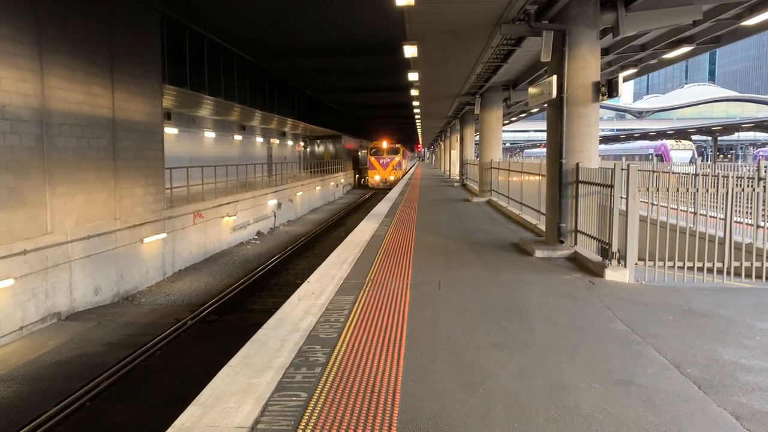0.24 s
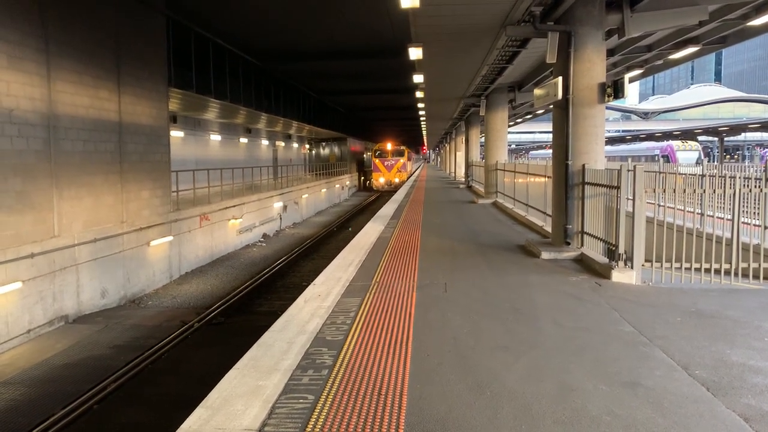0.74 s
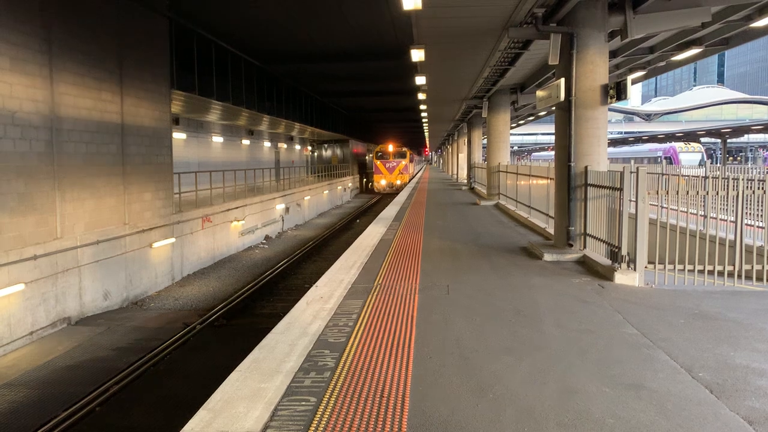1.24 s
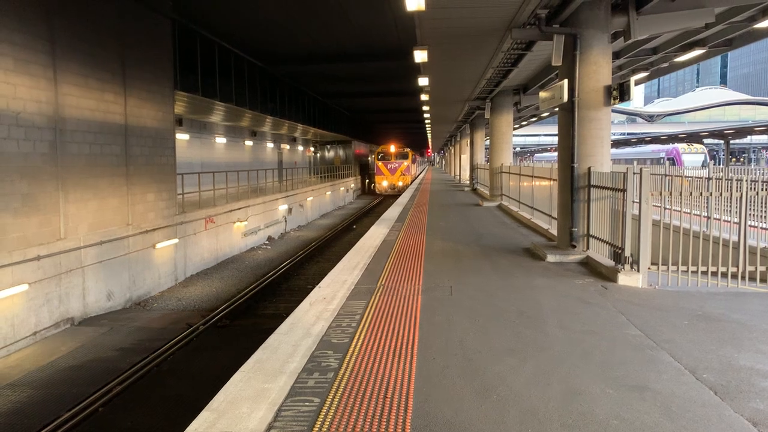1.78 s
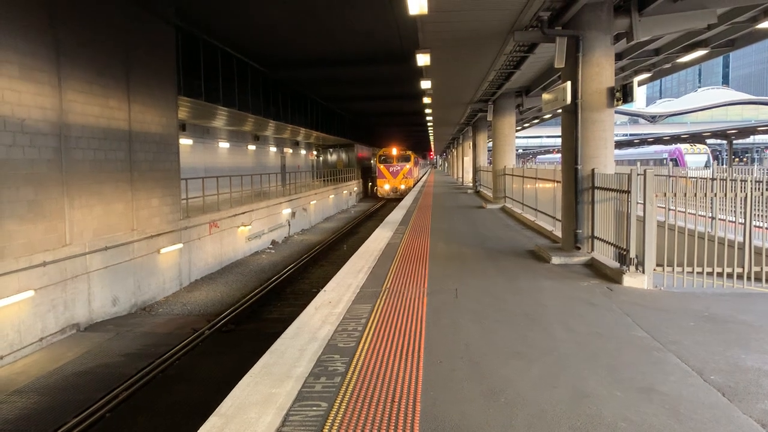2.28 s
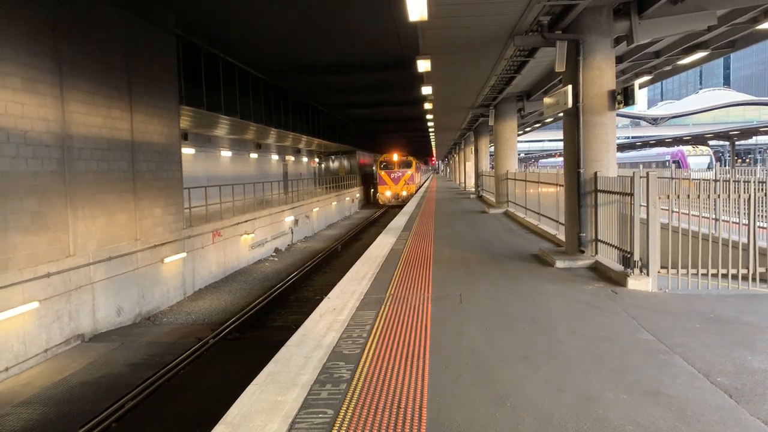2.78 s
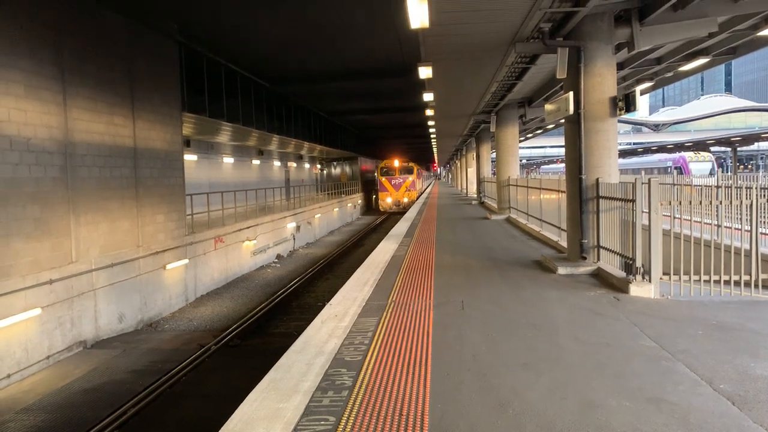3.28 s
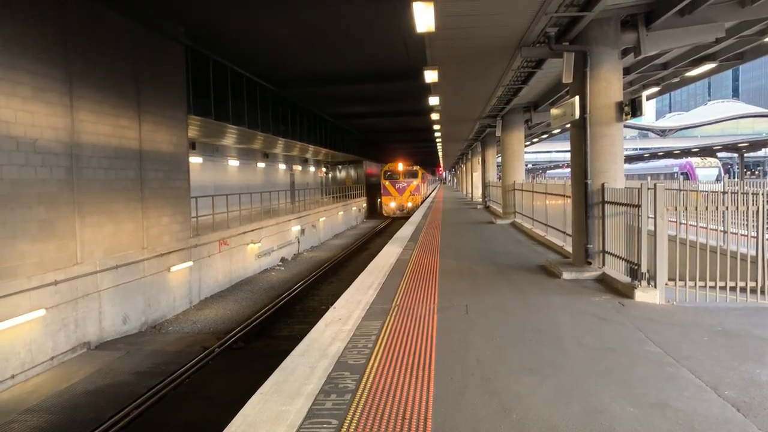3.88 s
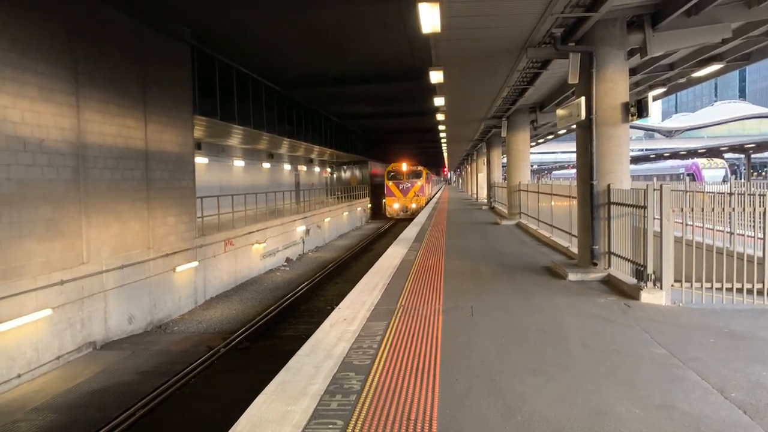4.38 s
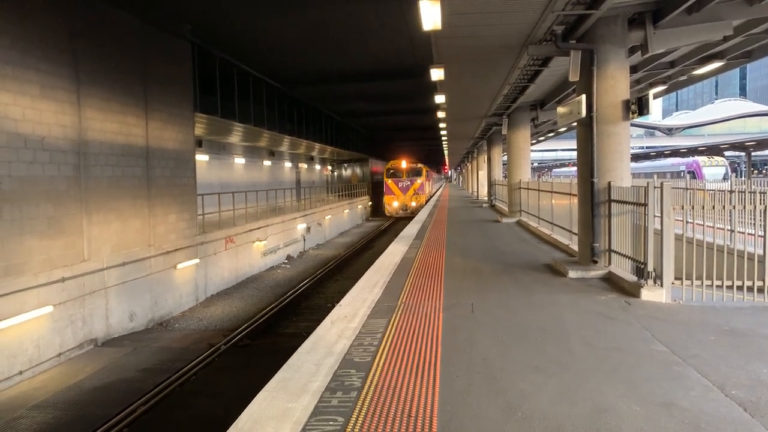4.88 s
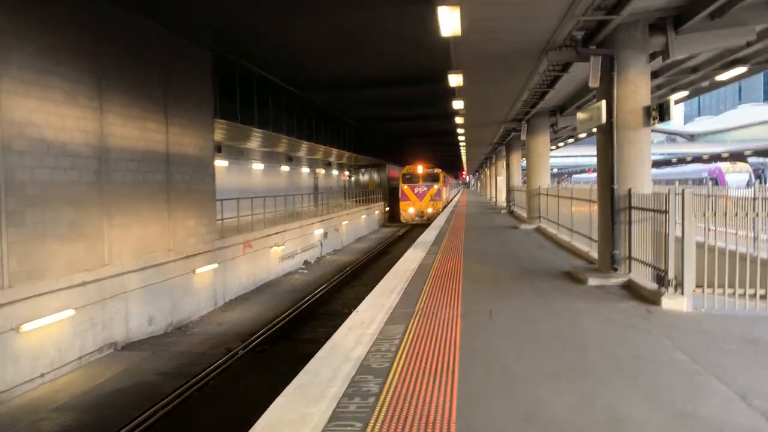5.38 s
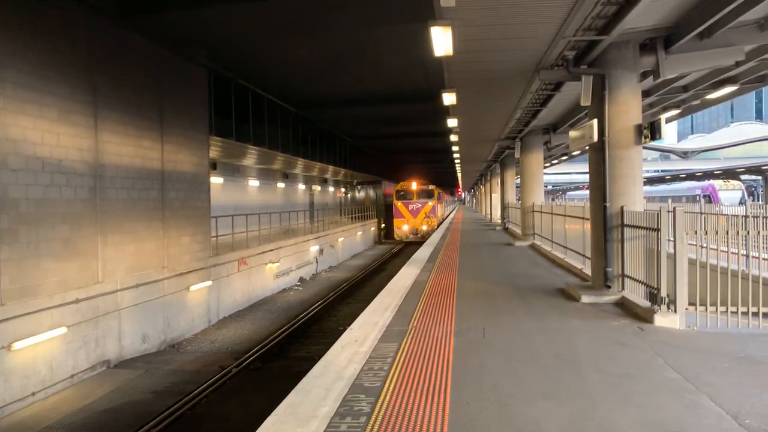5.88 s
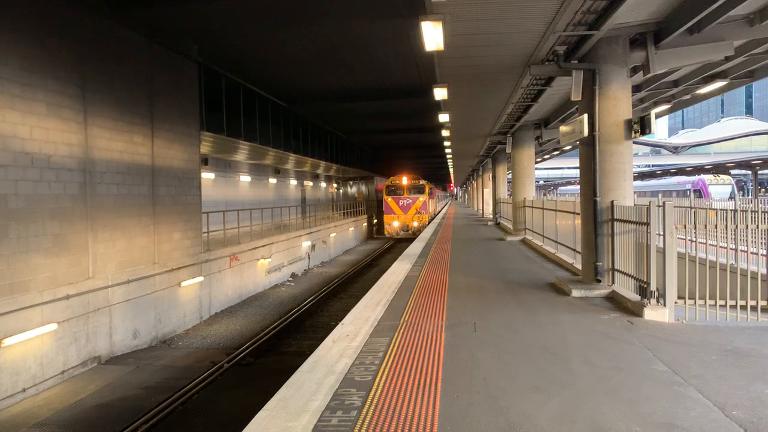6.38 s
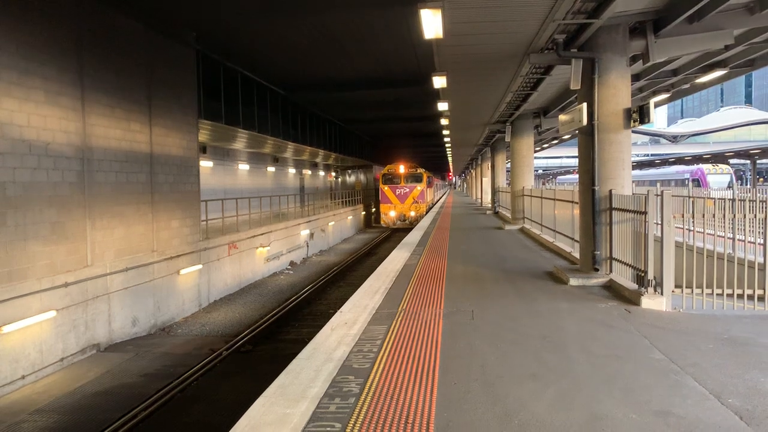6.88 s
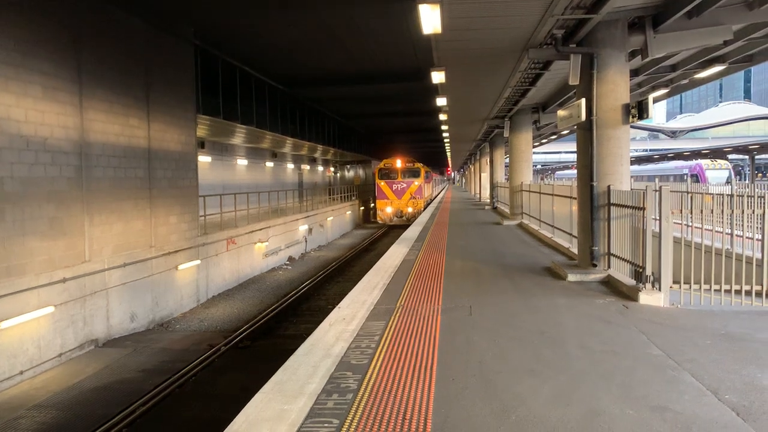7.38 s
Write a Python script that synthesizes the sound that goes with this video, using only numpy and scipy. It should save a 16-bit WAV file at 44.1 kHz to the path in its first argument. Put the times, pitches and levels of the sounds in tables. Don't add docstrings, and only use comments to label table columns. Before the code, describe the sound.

A heavy diesel engine rolls slowly toward a stationary listener on a covered platform, its buzzing low drone and fan noise gently rising in level and pitch. Then a piercing multi-note train horn sounds, starting with a fluttering, raspy catch, becoming a full brassy chord that sags slightly and shimmers with reflections. It shuts off abruptly into a short fluttering echo. Compact portable stereo microphone, automatic gain pushing the engine down.

```python
import sys
import numpy as np
from scipy import signal
from scipy.fft import rfft, irfft, next_fast_len
from scipy.io import wavfile
from scipy.ndimage import uniform_filter1d, map_coordinates

SR = 44100
rng = np.random.default_rng(int(sys.argv[2]) if len(sys.argv) > 2 else 0)


def field_ratio(decibels):
    return 10 ** (np.asarray(decibels, dtype=float) / 20)


def wav_record(signal):
    frames = np.transpose(np.atleast_2d(signal))
    bounded = np.clip(frames, -1, 1)
    quanta = np.round(bounded * 32767).astype(np.int16)
    wavfile.write(sys.argv[1], SR, quanta)


N = 337365
TIME = np.arange(N) / SR
COARSE = TIME[::32]
FIRST = int(4.6 * SR)
SHUT_S = 6.96


def horn():
    low, _, low_sound = chime("low", LOW_CROSS)
    third, third_top_db, third_sound = chime("third", THIRD_CROSS)
    sixth, _, sixth_sound = chime("sixth", SIXTH_CROSS)
    fifth, _, fifth_sound = chime("fifth", FIFTH_CROSS)
    ninth, _, ninth_sound = chime("ninth", NINTH_CROSS)
    sound = low_sound + third_sound + fifth_sound + sixth_sound + ninth_sound
    sound = sound + low_swells(low) + second_mode(third) + third_upper(third, third_top_db)
    teeth = [np.mod(p, 2 * np.pi) / np.pi - 1 for p in (low, third, fifth, sixth, ninth)]
    sound = sound + low_catch(teeth[0])
    sound = sound + field_ratio(-29) * bump(5.06, .06) * np.cos(third + 2 * low)
    top_db, blend_db, fronts_db = blow()
    top = field_ratio(top_db) * (0.6 * shock_fronts(teeth, fronts_db) + 0.75 * bell_air(low))
    first_notch = np.clip((5.7 - TIME) / .3, 0, 1)
    top = top - .42 * first_notch * filtered(top, lambda hz: hz > 8500)
    on = np.clip((TIME - 4.68) / 0.09, 0, 1)
    blend_on = np.clip((TIME - 4.76) / .08, 0, 1)
    blend = field_ratio(blend_db) * blend_on * combination_tones(teeth) * [[.95], [.7]]
    return sound + on * spread(top + field_ratio(-5) * hall(on * top[0]) + blend)


CHIMES = {"low": (5.015, 265.5, 1, 0), "third": (4.86, 325.75, .93, 1.8), "fifth": (5.28, 381.9, 1.44, 0),
          "sixth": (4.96, 461.9, .8, 1.5), "ninth": (5.42, 578, 2.18, 0)}
# (time [s], rise over settled [Hz])
SAG = [(4.8, 4.5), (5.02, 3.8), (5.3, 2.1), (5.6, 1.85), (6.0, .7), (6.4, .2), (6.7, .5), (7.0, -.2),
       (7.65, 0)]
RISE_DB_PER_S = {"low": 248, "third": 279, "fifth": 109, "sixth": 248.5, "ninth": 140}
PARTIALS = {"low": [(1, -24, -43), (2, -17.5, -37), (3, -25.5, -34), (4, -42.5, -34), (5, -29.5, -41),
            (6, -48.5, -47), (7, -37, -47), (8, -51, -52), (9, -39, -48)], "third": [(1, -22, -43),
            (2, -31.5, -36), (3, -36.5, -47), (4, -46.5, -48), (6, -45, -53), (7, -53, -57), (5, -39, -47)],
            "fifth": [(1, -29, -46), (2, -33, -48), (3, -50, -54)], "sixth": [(1, -21.5, -39),
            (2, -33.5, -42), (3, -52, -58)], "ninth": [(1, -32.5, -40), (2, -52.5, -55)]}
SCATTER_RAD = [6.3, 1.5]
# (partial [number], time [s],
# length [s], level [dB])
LOW_CROSS = [(1, 5.01, .05, -6), (1, 5.2, .05, -8), (2, 7.22, .07, -6), (1, 5.95, .12, 3),
             (1, 6.55, .13, -7), (1, 6.9, .05, -7), (1, 7.03, .18, -2), (3, 5.1, .06, 4),
             (3, 6.95, .08, -4), (1, 7.45, .2, 5), (2, 4.95, .04, -13), (3, 5.035, .02, 6),
             (2, 5.4, .08, -3), (2, 6.03, .08, -5), (2, 6.35, .06, 8), (3, 6.0, .06, -4), (3, 7.25, .1, -4),
             (4, 6.45, .1, 6), (4, 6.72, .05, -8), (5, 6.05, .08, -8), (6, 7.2, .06, 9), (6, 7.42, .1, 12),
             (2, 5.06, .07, 5), (2, 6.2, 0.15, -18), (2, 6.45, 0.19, -13.5), (2, 6.78, 0.4, -9),
             (3, 5.51, 0.11, -15), (3, 6.4, 0.24, -1), (3, 6.21, .07, 6), (3, 6.88, 0.09, -11),
             (3, 7.08, 0.07, 3), (4, 5.05, 0.07, 9), (4, 5.27, .24, 22), (4, 6.25, .14, 12.5),
             (4, 6.9, 0.15, 15), (4, 7.35, .3, 14), (6, 5.36, 0.11, 11.5), (6, 6.226, .65, 26.5),
             (5, 5.22, 0.13, -12.5), (5, 5.62, 0.22, -4), (5, 5.92, 0.099, -19), (7, 5.06, .05, 6),
             (7, 5.88, 0.17, 3), (7, 5.8, .12, 3.5), (7, 6.93, 0.28, -15), (9, 5.64, 0.22, -14),
             (9, 6.3, 0.055, -12), (9, 6.6, 0.28, 3), (9, 7.25, .15, -10),
             (7, 6.5, .07, 6), (7, 7.07, .08, 4), (7, 7.15, .1, 7), (7, 6.65, .08, -6),
                 (8, 6.15, .45, 18), (8, 6.5, .13, 6), (8, 6.75, .15, 10), (8, 7.35, .3, 9),
                 (9, 7.03, .06, 5)]
THIRD_CROSS = [(1, 5.6, .04, 9), (1, 5.4, .05, 6), (1, 7.35, .1, -6), (7, 6.5, .2, 6), (6, 5.3, .12, 9),
               (6, 7.0, .07, -8), (1, 6.1, .05, 4), (1, 5.85, .08, 5), (2, 5.1, .05, 8), (2, 5.6, .04, 7),
               (2, 7.2, .05, -15), (3, 5.05, .025, -8), (2, 7.3, .05, 7), (4, 5.35, .15, -5),
               (5, 6.35, .1, -8), (7, 4.89, .03, 6), (1, 4.92, .1, 11.5), (1, 5.35, 0.17, -3),
               (1, 5.58, 0.13, -15), (1, 5.8, 0.049, -11.5), (1, 6.92, .1, -6), (1, 7.3, .15, 3),
               (2, 4.89, 0.067, 16), (2, 5.02, 0.022, -16), (2, 5.56, 0.17, -14), (2, 5.8, 0.08, -20),
               (2, 6.31, 0.09, -22), (3, 4.94, 0.13, 19), (3, 5.14, .04, -9), (3, 5.65, 0.3, -15),
               (3, 7.15, .12, -7), (3, 6.21, 0.064, 8), (5, 4.85, .02, -20), (5, 4.9, 0.09, 13),
               (5, 5.13, 0.049, -14), (5, 6.9, .07, -11), (4, 4.92, .05, 16), (4, 6.6, 0.5, 11),
               (6, 4.95, 0.12, 17.5), (6, 5.4, 0.23, -13), (7, 4.93, .08, 9), (7, 5.7, .2, -2)]
FIFTH_CROSS = [(2, 7.0, .06, 7), (3, 7.0, .06, 8), (3, 7.3, .12, 9), (3, 5.7, .25, -10), (1, 7.35, .08, 5),
               (1, 5.35, 0.22, -6.5), (1, 5.56, 0.054, -16.5), (1, 5.88, .14, -14.5), (1, 6.9, 0.2, 6),
               (2, 5.25, 0.21, -16), (2, 6.7, .15, -12), (2, 7.1, .1, -6), (1, 7.23, .3, 4.5),
               (3, 6.0, 0.31, 12), (3, 6.72, .15, 4)]
SIXTH_CROSS = [(1, 5.1, .15, -3), (2, 5.0, .05, 6), (2, 7.3, .1, 8), (1, 4.99, .05, 7.5),
               (1, 5.37, 0.15, -5.5), (1, 6.85, 0.18, -7.5), (1, 7.2, 0.091, 2), (1, 7.55, 0.12, -17),
               (2, 7.55, .2, -18), (2, 5.38, 0.07, -3), (2, 6.27, 0.15, -12), (2, 6.84, .1, 8.5),
               (2, 4.91, .04, 14), (1, 4.9, .03, 7), (3, 6.15, 0.39, 10)]
NINTH_CROSS = [(1, 6.25, .06, 8), (2, 7.25, .1, 8), (1, 5.78, 0.13, 6), (1, 6.25, 0.16, -13),
               (1, 6.6, .08, -9), (1, 6.86, .06, 5.5), (1, 7.15, 0.084, 8), (2, 6.0, 0.23, 15),
               (2, 6.7, .2, 9)]
WALL_CROSS = {"low": [(2, 5.35, .12, 9), (2, 5.95, .2, 10), (2, 6.6, .3, -7), (2, 7.05, .1, 8),
              (3, 7.1, .1, 5), (4, 5.1, .06, 8), (4, 5.35, .15, 9), (4, 6.3, .1, -7), (4, 6.9, .15, 4),
              (5, 5.0, .1, -9), (5, 6.1, .06, -8), (5, 6.45, .1, 10), (5, 6.9, .2, 4), (6, 5.4, .2, -6),
              (6, 6.2, .2, 12), (7, 6.2, .08, -14), (7, 6.9, .12, 7), (8, 5.25, .25, -10),
              (8, 5.9, .15, 10), (8, 6.9, .15, 7), (9, 5.95, .08, 7), (9, 6.65, .08, 8)],
              "third": [(1, 4.9, .08, 17), (2, 4.97, .12, 9), (2, 6.05, .17, 12), (2, 6.65, .1, -7),
              (2, 7.0, .15, 6), (3, 4.9, .08, 12), (3, 5.45, .25, -7), (3, 5.95, .15, 6), (4, 4.9, .06, 12),
              (4, 5.27, .08, -9), (4, 6.45, .2, 8), (5, 4.96, .12, 20), (6, 4.95, .08, 9),
              (6, 5.95, .1, 13), (7, 4.92, .08, 19), (7, 6.35, .1, 11)], "fifth": [(2, 6.3, .2, 13),
              (2, 6.9, .15, 7), (1, 6.35, .2, -8), (3, 6.2, .3, 8)], "sixth": [(1, 5.0, .05, 10),
              (1, 6.0, .3, 9), (2, 5.0, .06, 8), (2, 5.55, .08, -12), (2, 6.75, .1, 6)],
              "ninth": [(1, 5.65, .2, 6), (1, 6.15, .15, 3)]}


def chime(name, crossings):
    speaks, settled, follows, overshoot = CHIMES[name]
    early = np.exp(-np.maximum(TIME - speaks, -.1) / .07)
    phase = angle(settled + follows * curves(SAG)[0] + overshoot * early + 0.33 * wobble(25))
    after = np.maximum(COARSE - SHUT_S, 0)
    echoes_db = 3.5 * np.clip((COARSE - SHUT_S) / .15, 0, 1)
    heard = slice(int((speaks - .4) * SR), N)
    sound = np.zeros((2, N))

    def swells(rows, k):
        return sum(db * np.exp(-((COARSE - s) / length) ** 2) for j, s, length, db in rows if j == k)

    for k, db, wall_db in PARTIALS[name]:
        ring_db_per_s = 41.5 * (k * settled / 500) ** .27
        blown_db = RISE_DB_PER_S[name] * np.minimum(COARSE - speaks, 0)
        blown_db = blown_db - ring_db_per_s * after - 5 * np.minimum(after / 0.056, 1)
        level_db = db + blown_db + swells(crossings, k)
        wall_db = wall_db + blown_db + swells(WALL_CROSS[name], k) + (1.5 + echoes_db) * slow(14)
        turned = k * phase[heard] + np.pi + SCATTER_RAD[name == "third"] * rng.random()
        ahead = fine(field_ratio(level_db + 1.3 * slow(30) + echoes_db * slow(14)), heard) * np.cos(turned)
        beside = fine(field_ratio(wall_db), heard) * np.sin(turned + fine(.8 * slow(3), heard))
        sound[:, heard] += np.sqrt(2) * np.array([ahead + beside, ahead - beside])
    return phase, level_db, sound


# (partial [number], base [dB], swell time
# [s], length [s], swell [dB])
SWELLS = [(12, -62, 5.33, .08, 14), (12, -62, 6.8, .18, 16), (14, -62, 6.55, .3, 9),
          (11, -60, 6.17, .15, 16), (10, -45, 5.15, 0.15, 5), (11, -62, 5.5, 0.25, 18),
          (12, -62, 5.86, 0.13, 20), (13, -49, 5.3, 0.3, -10), (15, -58, 5.4, .3, 8)]


def low_swells(low):
    valve_db = np.interp(COARSE, [4.95, 5.04, 6.95, 7.65], [-43, 0.5, -2.0, -31])
    sound = 0
    for k, db, s, length, swell_db in SWELLS:
        level_db = db + swell_db * np.exp(-((COARSE - s) / length) ** 2)
        level_db = level_db + 2 * slow(6.6) + np.sqrt(k) * (0.7 * slow(20) + 0.62 * valve_db)
        level_db = np.where(COARSE > 4.9, level_db, -200)
        sound = sound + tone(k * low + 6 * rng.random(), level_db, drift=.1 * k ** .8)
    return sound


# (time [s], level [dB])
FLUTTER = [
    (4.8, -52.5),
    (4.84, -25),
    (4.87, -20.5),
    (4.915, -23),
    (4.95, -37),
    (5.0, -70),
]
# (multiple of the third's pitch [ratio], level [dB])
FLUTTER_PARTIALS = [(1.421, -23), (2.44, 4.5), (2.93, -6), (3.435, -5), (4.392, -14.5)]


def second_mode(third):
    flutter_db = np.interp(COARSE, *np.transpose(FLUTTER))
    near = abs(COARSE - 4.9) < .12
    return sum(tone(k * third, np.where(near, db + flutter_db, -200), drift=0.34) for k, db in FLUTTER_PARTIALS)


# (partial [number], level against its fifth partial [dB])
THIRD_UPPER = [(8, -11), (10, -22), (11, -18), (13, -21), (14, -21), (18, -21)]


def third_upper(third, top_db):
    return sum(tone(k * third + 6 * rng.random(), db + top_db + 3.2 * slow(6), drift=1.0) for k, db in THIRD_UPPER)


def low_catch(low_teeth):
    rasp = unit(filtered(np.diff(low_teeth, prepend=0), lambda hz: abs(hz - 6750) < 900))
    return field_ratio(-50) * np.clip((TIME - 5.02) / .02, 0, 1) * bump(5.1, .13) * rasp


# (time [s], opening from first notch 0 to full 1 [ratio])
VALVE = [
    (4.72, 0.094),
    (5.6, -0.12),
    (5.72, .5),
    (5.9, 0.87),
    (6.2, 0.97),
    (6.5, 0.83),
    (6.9, 0.73),
]
# (time [s], length [s], level [dB])
PUFFS = [
    (4.74, .06, 3),
    (4.868, 0.033, 7),
    (5.068, 0.038, 4.5),
    (6.97, 0.01, 1.5),
]


def blow():
    opening, after = curves(VALVE)[0], np.maximum(TIME - SHUT_S, 0)
    puffs_db = sum(db * bump(s, length) for s, length, db in PUFFS)
    top_db = -47.5 + 13.5 * opening + puffs_db - 54 * (1 - np.exp(-after / 0.19))
    blend_db = -35.5 + 3.5 * opening + 1.1 * puffs_db - 53 * after - 4 * np.minimum(after / .15, 1)
    fronts_db = 2.5 - 7 * opening + 7 * bump(4.3, .15)
    return top_db, blend_db, fronts_db


def shock_fronts(teeth, fronts_db):
    low_on = np.clip((TIME - 4.98) / .06, 0, 1)
    steps = low_on * teeth[0] + (0.33 + bump(4.93, .07)) * teeth[1] + 0.21 * teeth[2] + 0.12 * teeth[3]
    fronts = unit(filtered(np.diff(steps, prepend=0), lambda hz: field_ratio(along(BELL, hz))))
    fronts = 0.4 * fronts + 0.9 * hall(fronts)
    fronts = patchy(fronts[:, FIRST:], 2.5)[:, :N - FIRST]
    return field_ratio(fronts_db) * np.pad(fronts, ((0, 0), (FIRST, 0)))


# (frequency [Hz], density [dB per Hz])
BELL = [(1800, -120), (2600, -5), (3500, -2), (5000, -4), (7000, 2), (8600, -3), (10500, -3.5), (12000, -6),
        (13500, -11), (15300, -13), (16300, -120)]


def bell_air(low):
    return rush(BELL, patchy_db=0.5) * (1 + 1.4 * np.cos(low))


# (frequency [Hz], density [dB per Hz])
BLEND = [(230, -120), (300, -11), (500, -4), (720, -4.5), (1000, 3), (1400, 1.5), (1900, 1), (2500, -2.5),
         (4000, -10), (6000, -120)]


def combination_tones(teeth):
    pairs = sum(teeth[i] * teeth[j] for i in range(5) for j in range(i))
    tones = unit(filtered(hall(pairs), lambda hz: field_ratio(along(BLEND, hz))))
    air_on = np.interp(TIME, [6.95, 7.1], [1, .05])
    return tones + .5 * air_on * rush(BLEND, patchy_db=4.5)


# (time [s], shaft rate [cycles per s])
SHAFT = [(0, 5.988), (0.6, 5.996), (1.2, 6.039), (1.8, 6.074), (2.4, 6.119), (3, 6.139), (3.6, 6.178),
         (4.2, 6.193), (4.8, 6.195), (5.6, 6.211), (6.5, 6.215), (7.65, 6.192)]
# (time [s], firing tone [dB], roar [dB], hiss [dB])
EXHAUST = [
    (0.0, -14.5, -35.5, -48.5),
    (0.05, -17, -37, -51),
    (4.75, -11.5, -33.5, -45.5),
]
# (time [s], level [dB])
DUCK = [
    (4.8, 0.5),
    (4.92, -3.5),
    (5.02, -12),
    (5.13, -21),
    (5.6, -19.5),
    (6.3, -23.5),
    (6.9, -26),
    (7.65, -25),
]


def engine():
    tone_db, roar_db, hiss_db = curves(EXHAUST)
    duck_db = curves(DUCK)[0]
    shaft = angle(curves(SHAFT)[0])
    firing = field_ratio(duck_db + tone_db + 3.0) * throb(shaft)
    roar = field_ratio(roar_db + 1.0 * duck_db + 8) * (rumble() + fan_blades(shaft))
    hiss = field_ratio(hiss_db + 1.12 * duck_db + 4.5 + 0.23 * wobble(3.7)) * (airy_hiss() + turbo_whine())
    return firing + roar + hiss


# (order [per cycle], level [dB], fade until 4 s [dB per s], crank angle [rad])
THROB = [
    (9, 0, 0, 3.14),
    (10, -11.5, -1.4, -.6),
    (7.98, -6.5, 0, 3.7),
]
# (order [per cycle], level under the tone [dB])
ORDERS_DB = [(6, -34), (7, -27), (8.5, -41.5), (9.5, -28.5), (11, -20), (12, -19), (12.5, -24), (13, -40),
             (14, -35), (15, -23), (16, -22.5), (17, -25), (18, -23), (25, -32), (26, -34), (27, -26.5)]
CRANK = {6: 2.6, 7: -2, 11: -1.9, 12: -.6, 15: .3, 16: 2.6, 17: 1.5}


def throb(shaft):
    node = np.maximum(1 - TIME / 3.25, -.2)
    firing = 0
    for k, db, fade, crank in THROB:
        gain = field_ratio(db + fade * np.minimum(TIME, 4) + 0.41 * wobble(3.3))
        firing = firing + gain * (node if k < 8 else 1) * np.cos(k * shaft + crank)
    orders = 0
    for k, db in ORDERS_DB:
        wander = (.3 if k in CRANK else 1.1) * slow(2.5)
        orders = orders + field_ratio(db + 2.1 * slow(2.53)) * np.cos(k * shaft[::32] + CRANK.get(k, 0) + wander)
    return firing + fine(orders)


# (order [per cycle], level against roar [dB])
FAN = [(39.5, -11), (53.5, -14), (70.5, -15), (79, -12.5), (118.5, -13.5), (237, -24)]
# (time [s], length [s], level [dB])
FAN_BELLIES = [
    (.1, 0.33, 11.5),
    (2.796, .25, 14),
    (4.65, .35, 9),
]


def fan_blades(shaft):
    bellies_db = sum(db * bump(s, length) for s, length, db in FAN_BELLIES)[::32]
    blades = 0
    for k, db in FAN:
        phase = k * shaft + .18 * np.sqrt(k) * wobble(12)
        blades = blades + tone(phase, db + (k < 40) * bellies_db + 2.6 * slow(4), drift=.12)
    return blades


# (start [s], frequency [Hz], end [s], frequency [Hz], level [dB])
WHINES = [
    (0, 5020, 5.0, 5255, -10),
    (.3, 4025, 2.6, 4045, -12),
    (3.6, 3215, 5.0, 3240, -7),
    (1, 3180, 3.4, 3210, -10),
    (.4, 4330, 2.9, 4350, -17),
    (0, 3560, 1.5, 3580, -15),
]
WHINE_WIDTHS = [130, 45, 50, 70, 50, 50]


def turbo_whine():
    whine = 0
    for (t0, hz0, t1, hz1, db), width in zip(WHINES, WHINE_WIDTHS):
        left_s = t1 - TIME + SR * (t1 > 4.9)
        fade = np.clip(np.minimum(TIME - t0, left_s) / .3 + (t0 == 0), 0, 1)
        phase = angle(np.interp(TIME, [t0, t1], [hz0, hz1]))
        narrow = [wobble(width) * np.cos(phase) + wobble(width) * np.sin(phase) for _ in range(2)]
        whine = whine + fade * field_ratio(db) * np.array(narrow)
    return whine


# (frequency [Hz], density [dB per Hz])
ROAR = [(20, -120), (32, -4.5), (60, -2.5), (100, 0), (122, 2.5), (155, 3), (200, 4), (320, 2), (480, 0.5),
        (750, -5), (1200, -9), (2000, -17.5), (3500, -39.5), (7000, -60), (16000, -120)]


def rumble():
    return field_ratio(.4 * wobble(2.5)) * spread(rush(ROAR, patchy_db=1))


# (frequency [Hz], density [dB per Hz])
HISS = [(200, -120), (700, -19.5), (1600, 3.5), (2500, 2.5), (4000, -2.5), (5500, -11), (7000, -16),
        (9200, -35), (10300, -25.5), (11000, -38), (13000, -44.5), (15700, -38), (16500, -120)]


def airy_hiss():
    airy = spread(rush(HISS, patchy_db=.4))
    treble = filtered(airy, lambda hz: np.clip(hz / 2000 - 3, 0, 1))
    return airy + field_ratio(3.7 * np.minimum(TIME, 5) - 13) * treble


# (frequency [Hz], 60 dB decay time [s])
HALL = [(250, 0.5), (1000, 0.91), (4000, 0.64), (12000, 0.2)]


def hall(x):
    hz, t, z = signal.stft(rng.standard_normal((2, SR)), SR, nperseg=256)
    tail = signal.istft(z * field_ratio(-60 * t / along(HALL, hz)[:, None]), SR, nperseg=256)[1]
    answer = signal.fftconvolve(x[None, FIRST:], tail / np.linalg.norm(tail[0]), axes=1)[:, :N - FIRST]
    return np.pad(answer, ((0, 0), (FIRST, 0)))


# (frequency [Hz], left-right likeness [ratio])
ALIKE = [(60, 1), (400, .88), (650, .6), (1300, .25), (5700, .25), (6400, .5), (7500, .75), (8600, .98),
         (16000, .99)]


def spread(pair):
    turn = lambda hz: np.arccos(np.clip(along(ALIKE, hz), -1, 1)) / 2
    mid, side = filtered(pair, lambda hz: [np.cos(turn(hz)), np.sin(turn(hz))])
    return np.array([mid + side, mid - side])


def tone(phase, db, drift):
    out, heard = np.zeros((2, N)), slice(32 * np.argmax(db > -95), N)
    gain = np.sqrt(2) * field_ratio(db)
    ahead = fine(gain, heard) * np.cos(phase[heard])
    beside = fine(gain * drift * slow(1.498), heard) * np.sin(phase[heard])
    out[:, heard] = [ahead + beside, ahead - beside]
    return out


def rush(spectrum, patchy_db):
    noise = patchy(rng.standard_normal((2, N + 512)), patchy_db)
    return unit(filtered(noise, lambda hz: field_ratio(along(spectrum, hz))))


def patchy(pair, patchy_db):
    z = signal.stft(pair, nperseg=512)[2]
    field = uniform_filter1d(uniform_filter1d(rng.standard_normal(z.shape[1:]), 4, 0), 20, 1)
    return signal.istft(z * field_ratio(patchy_db * unit(field)), nperseg=512)[1][:, :N]


def bump(s, length):
    out, near = np.zeros(N), slice(max(int((s - 4 * length) * SR), 0), int((s + 4 * length) * SR))
    out[near] = np.exp(-((TIME[near] - s) / length) ** 2)
    return out


def slow(rate):
    return map_coordinates(rng.standard_normal(int(N * rate / SR) + 4), [COARSE * rate])


def fine(control, part=slice(0, N)):
    return np.interp(TIME[part], COARSE, control)


def wobble(rate):
    return fine(slow(rate))


def curves(rows):
    s, *cols = np.transpose(rows)
    return [np.interp(TIME, s, c) for c in cols]


def along(points, hz):
    f, v = np.transpose(points)
    return np.interp(np.log(hz + 1), np.log(f + 1), v)


def angle(hz):
    return 2 * np.pi * np.cumsum(hz) / SR


def unit(x):
    return x / np.sqrt(np.mean(x ** 2) + 1e-20)


def filtered(x, response):
    m = next_fast_len(N + SR // 2)
    return irfft(rfft(x, m) * response(np.fft.rfftfreq(m, 1 / SR)), m)[..., :N]


def scene():
    return engine() + horn()


# (frequency [Hz], phase by which left leads [rad])
PORT_TURN = [(20, .4), (43, .6), (86, .9), (129, 1.8), (172, 2.6), (215, 3.4), (258, 3.8), (344, 5.1),
             (430, 6.28), (6000, 6.28), (7500, 4.5), (8600, 3.14), (10800, 0), (12900, -2.9), (14200, -3.4),
             (15500, -6.28)]
# (frequency [Hz], left minus right [dB])
LEAN = [(60, -4), (130, -0.5), (380, 0), (500, -4), (1300, -.5), (4000, -1.5), (5300, -5), (7500, 0)]


def microphone_ports(x):
    side = np.array([[.5], [-.5]])
    return filtered(x, lambda hz: field_ratio(side * along(LEAN, hz)) * np.exp(1j * side * along(PORT_TURN, hz)))


def band_limit(x):
    return signal.sosfilt(signal.butter(12, 16940, fs=SR, output="sos"), x)


def record(dry):
    opening = np.clip(TIME / .012, 0, 1)
    ports = microphone_ports(opening * dry)
    rounded = ports / (1 + np.abs(ports / .95) ** 5) ** (1 / 5)
    mix = filtered(rounded, lambda hz: hz < 15750)
    return band_limit(mix)


dry = scene()
out = record(dry)
wav_record(out)
```